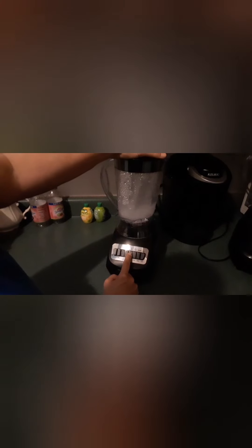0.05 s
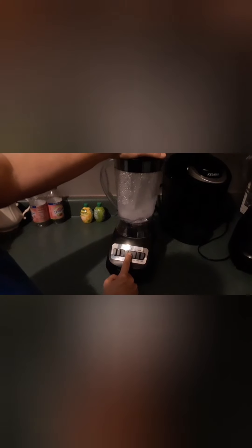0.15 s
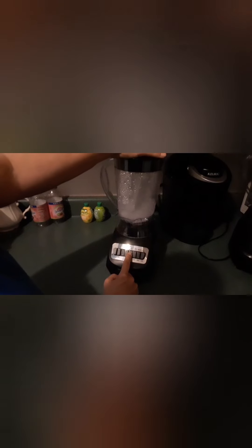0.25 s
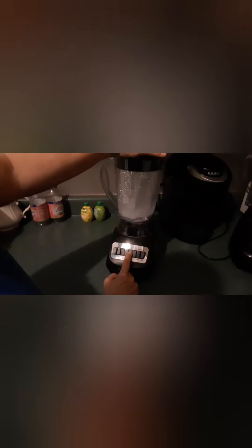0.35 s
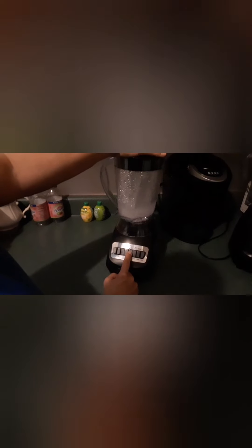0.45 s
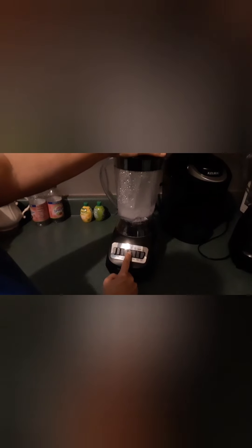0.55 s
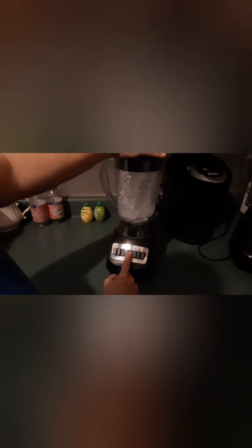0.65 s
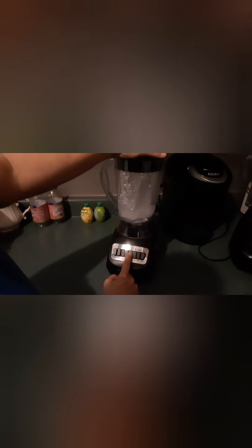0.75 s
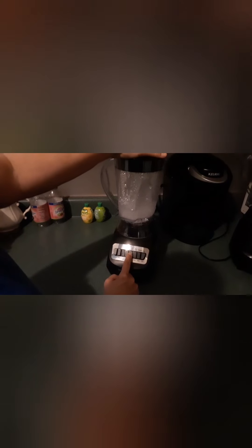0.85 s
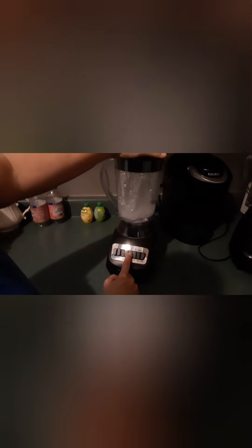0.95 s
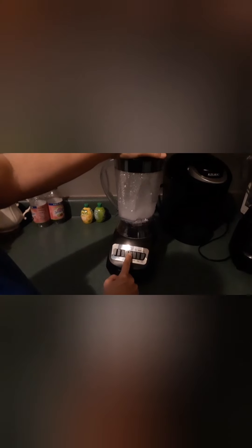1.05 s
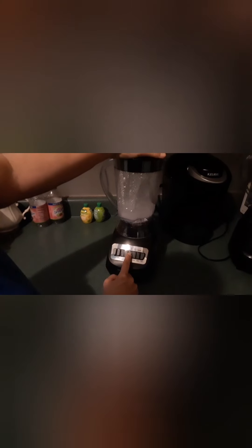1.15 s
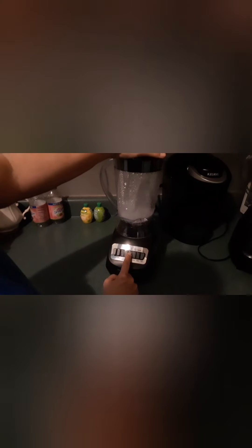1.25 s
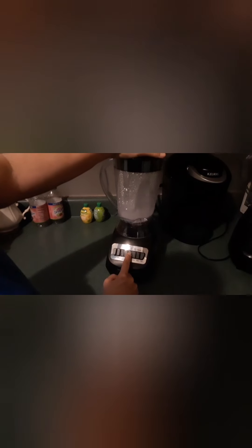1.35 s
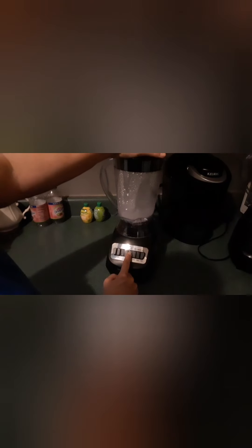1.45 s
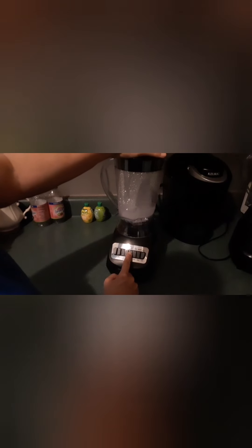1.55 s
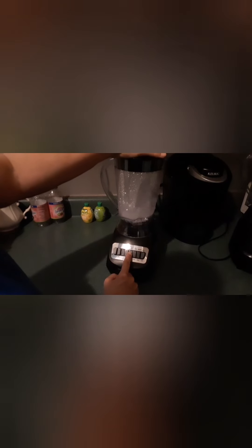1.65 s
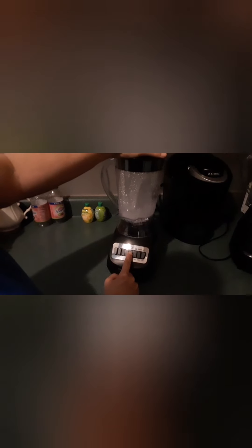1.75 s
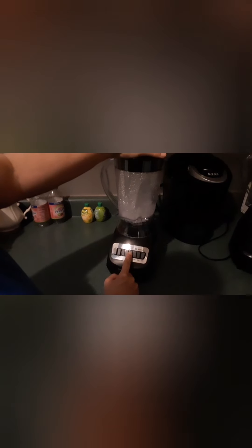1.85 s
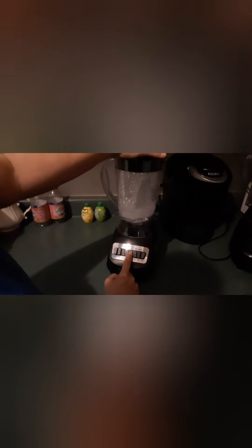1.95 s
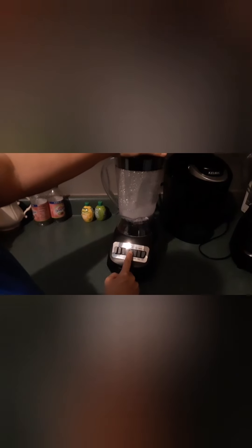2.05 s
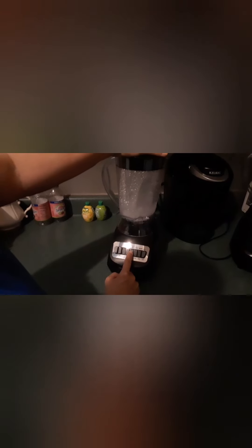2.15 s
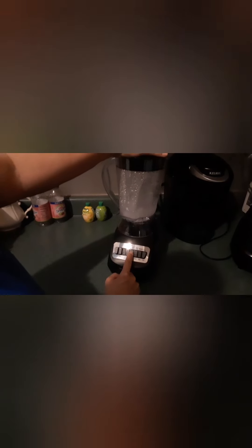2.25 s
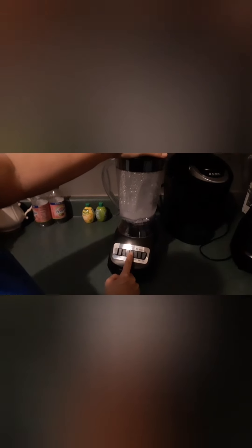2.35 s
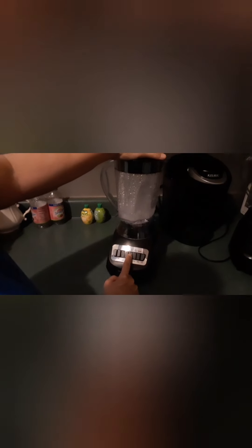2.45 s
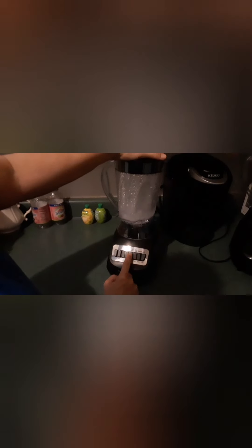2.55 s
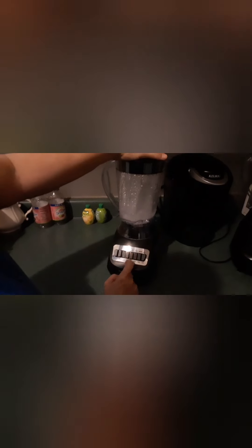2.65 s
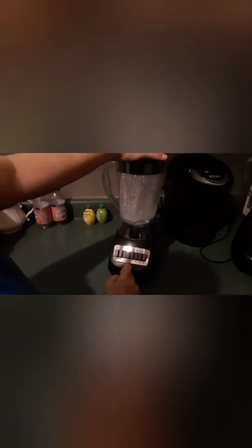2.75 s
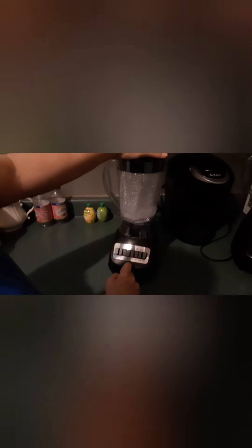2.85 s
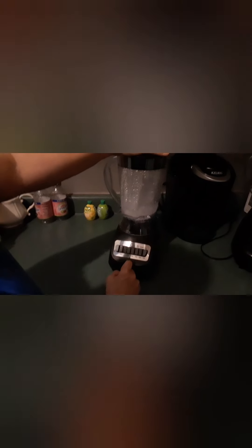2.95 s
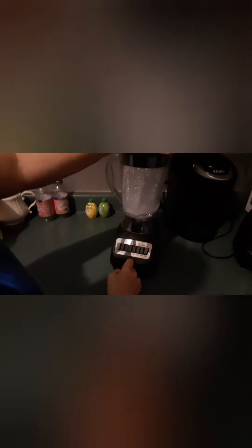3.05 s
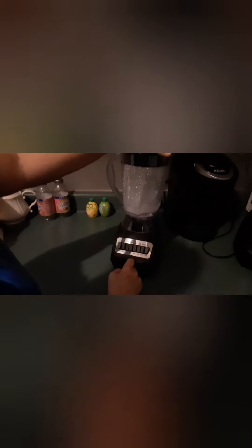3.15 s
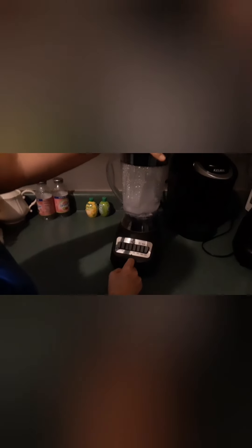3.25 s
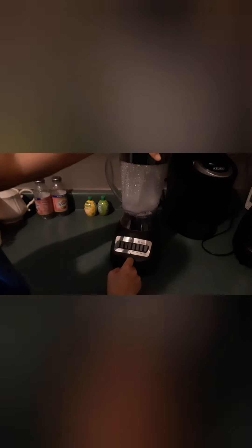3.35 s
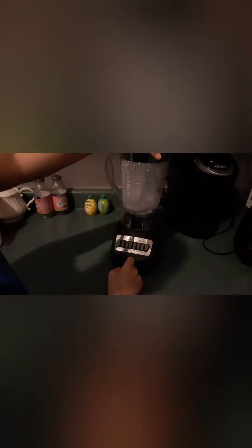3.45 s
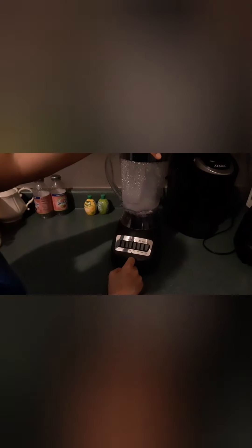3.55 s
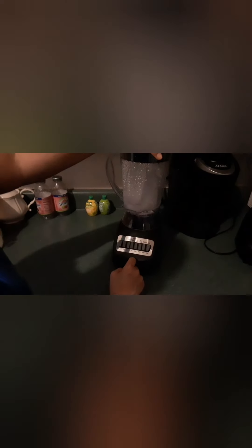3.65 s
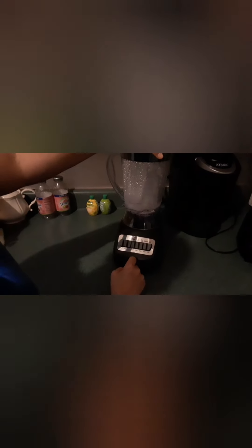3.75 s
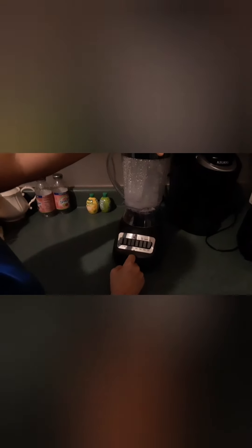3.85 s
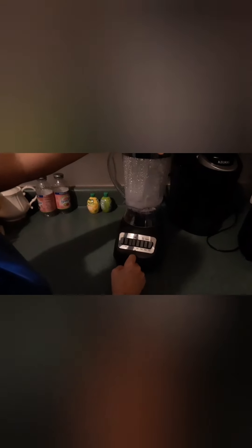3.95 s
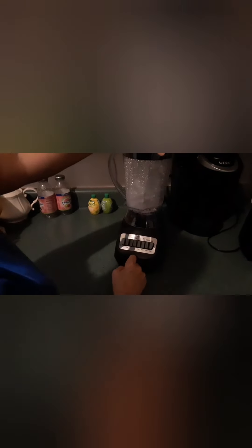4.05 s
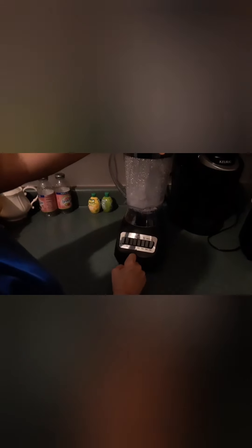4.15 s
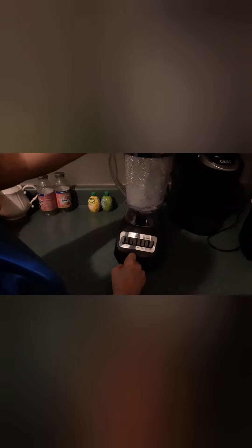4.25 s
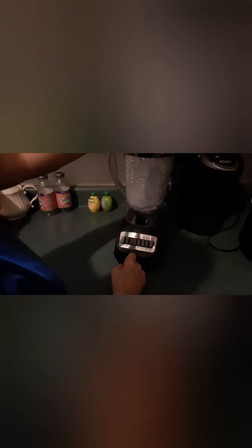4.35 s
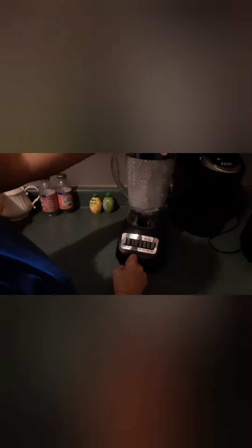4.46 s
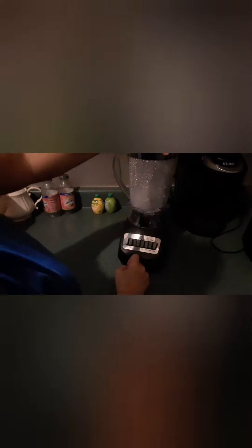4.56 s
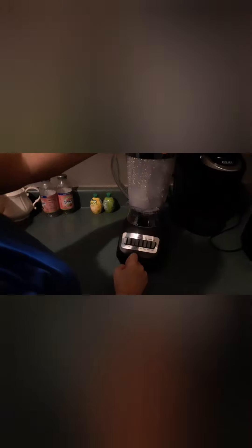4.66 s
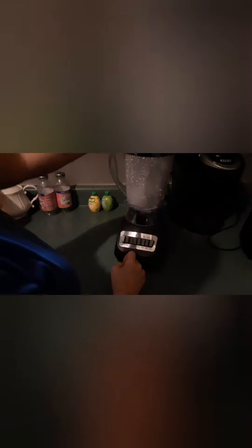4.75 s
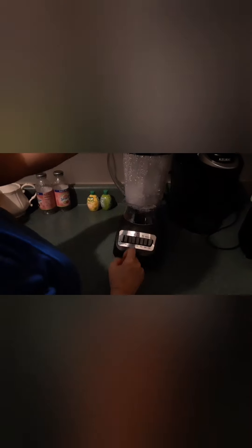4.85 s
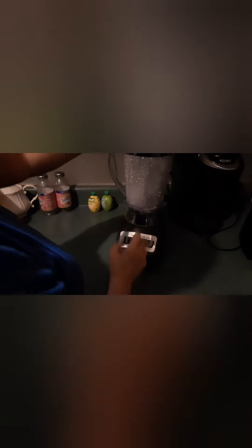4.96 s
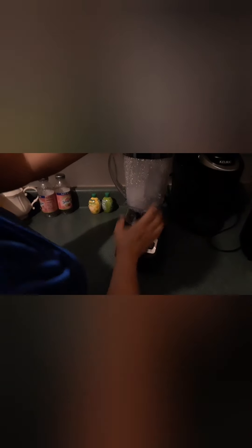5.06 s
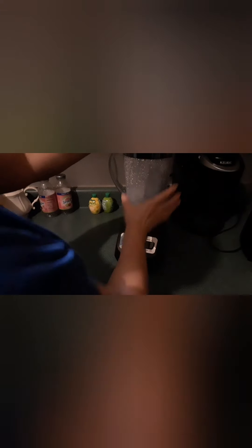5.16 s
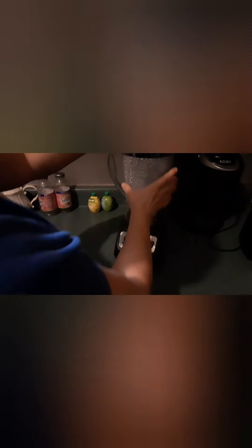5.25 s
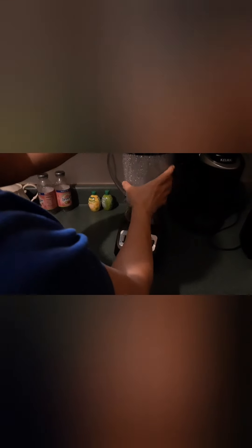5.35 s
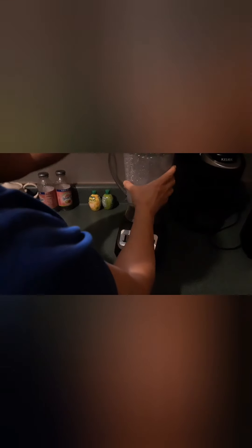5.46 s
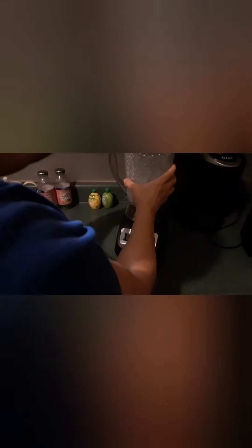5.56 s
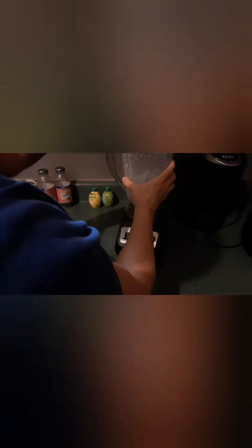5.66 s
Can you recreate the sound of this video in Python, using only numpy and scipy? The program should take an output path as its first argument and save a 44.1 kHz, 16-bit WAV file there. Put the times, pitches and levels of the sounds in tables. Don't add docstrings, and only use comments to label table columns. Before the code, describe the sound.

Loud steady blender churning icy slush, then a gliding wind-down, rattling ice knocks, a faint chatter to rest and soft handling in a quiet kitchen.

```python
import sys
import numpy as np
from scipy import signal
from scipy.fft import rfft, irfft, next_fast_len
from scipy.io import wavfile

SR = 44100
rng = np.random.default_rng(int(sys.argv[2]) if len(sys.argv) > 2 else 0)


def to_wav(s):
    ch = np.atleast_2d(s).T
    pcm = np.round(np.clip(ch, -1, 1) * 32767)
    wavfile.write(sys.argv[1], SR, pcm.astype(np.int16))


def rack_gain(trim_db):
    fader = np.asarray(trim_db, float)
    return 10 ** (fader / 20)


N = 251370
T = np.arange(N) / SR

FULL_HZ, SWITCH_OFF_S = 317.6, 2.07

# frequency in Hz, shared part of the power (0 to 1).
LIKENESS = [(40, .85), (150, 0.98), (300, 1), (650, 0.91), (1200, 0.72), (3000, 0.32), (12000, 0.11)]
# frequency in Hz, left over right in dB.
LEFT_OVER_RIGHT = [(60, -0.5), (150, 2), (380, 2), (950, 2.5), (2380, -5.5), (5980, -1.5), (15000, -7)]


def rms_one(x):
    return x / np.sqrt(np.mean(x ** 2) + 1e-20)


def in_time(rows):
    s, *columns = np.transpose(rows)
    return [np.interp(T, s, c) for c in columns]


def at_hz(points, hz):
    point_hz, value = np.array(points).T
    return np.interp(np.log(hz), np.log(point_hz), value)


def alike_at(hz):
    return np.clip(at_hz(LIKENESS, hz), 0, 1)


def lean_db(hz):
    return at_hz(LEFT_OVER_RIGHT, hz) * np.array([[.5], [-.5]])


def drift(rate):
    r = np.exp(-80 * np.pi * rate / SR)
    slow = signal.lfilter([1], [1, -2 * r, r * r], rng.standard_normal(N // 40 + 2002))[2000:]
    return np.interp(np.arange(N) / 40, np.arange(len(slow)), rms_one(slow - slow.mean()))


def resonance(x, hz, width_hz):
    r = np.exp(-np.pi * width_hz / SR)
    top = np.array([1, 0, -1]) * (1 - r * r) / 2
    return signal.lfilter(top, [1, -2 * r * np.cos(2 * np.pi * hz / SR), r * r], x + 1e-18)


def twice_resonant(x, hz, width_hz):
    return resonance(resonance(x, hz, width_hz), hz, width_hz)


def cut(x, hz, kind, order=2):
    return signal.sosfilt(signal.butter(order, hz, kind, fs=SR, output="sos"), x)


def bands(spectrum, patchy_db, count):
    size = next_fast_len(N)
    hz = np.maximum(np.arange(size // 2 + 1) * SR / size, 1)
    shared, *own = rfft(rng.standard_normal((3, size)))
    alike = alike_at(hz)
    turn = 1.75 * np.sin(2 * np.pi * hz / 1700) * (hz > 900)
    lag = np.exp(1j * turn * np.array([[1], [0]]))
    ears = np.sqrt(alike) * shared * lag + np.sqrt(1 - alike) * np.array(own)
    ears = ears * rack_gain(at_hz(spectrum, hz) + lean_db(hz))
    place = np.clip(np.log(hz / 60) / np.log(260) * (count - 1), 0, count - 1)
    together = drift(4.0)
    for k in range(count):
        share = np.clip(1 - abs(place - k), 0, 1)
        flicker = rack_gain(patchy_db * (.2 * together + drift(14)))
        centre_hz = 60 * 260 ** (k / (count - 1))
        yield centre_hz, flicker * irfft(ears * share, size)[:, :N]


def shaft_hz():
    drag_per_s, friction_hz = .56, 95
    coast_s = np.maximum(T - SWITCH_OFF_S, 0)
    return np.maximum((FULL_HZ + friction_hz) * np.exp(-drag_per_s * coast_s) - friction_hz, .01)


def shaft_turns():
    return np.cumsum(shaft_hz()) / SR


def speed_db():
    return 20 * np.log10(shaft_hz() / FULL_HZ)


def swell_db(hz, db, width):
    return db - 6 * (np.log(shaft_hz() / hz) / width) ** 2


def motor_tones(turns):
    # multiple of the shaft speed, level in dB.
    order_levels = [(2, -3), (3, -10), (4, -6), (5, 1), (6, 2), (8, -1), (10, 2)]
    # shaft speed in Hz, level in dB, width as a log ratio.
    order_swells = [(264, -30.5, .18), (143, -45, .04)]
    # frequency in Hz, level in dB.
    housing = [(400, -6), (800, -3), (1000, -8), (1180, 1), (1350, -7), (1500, 2), (1900, 1), (2020, -5),
               (2220, 6), (2400, -3), (2600, 3), (3000, 3), (3200, -4)]
    powered = np.clip((SWITCH_OFF_S + .06 - T) / .06, 0, 1)
    unbalance_db = swell_db(275, -34, .2) - 6 * powered
    unbalance = rack_gain(unbalance_db + 3 + 2.5 * drift(10)) * np.sin(2 * np.pi * turns + .5 * drift(10))
    orders_db = np.maximum(*[swell_db(*row) for row in order_swells])
    orders, speed_hz = np.zeros((2, N)), np.gradient(turns) * SR
    for multiple, db in order_levels:
        waver_db = 3.5 * drift(10)
        ear_turns = rng.uniform(-.12, .12, (2, 1))
        phase = 2 * np.pi * (multiple * turns + ear_turns) + .7 * drift(10)
        level_db = orders_db + db + at_hz(housing, multiple * speed_hz) + waver_db
        orders += rack_gain(level_db + [[-2], [1]]) * np.sin(phase)
    return unbalance, orders


def roar(turns):
    # time in seconds, level in dB.
    churn = [(0, -12.5), (.5, -13), (1.3, -13), (1.6, -12.5), (2.09, -13), (2.25, -15), (2.41, -19.5),
             (2.6, -21), (2.72, -22.5), (2.97, -27), (3.25, -33), (3.4, -41.5), (3.6, -67)]
    # level in dB at full churn, share of the churn's swing.
    churn_layers = [(-29.5, 0.76), (-13, 1.052), (-15, 1.7)]
    # level in dB at full speed, dB per dB of speed.
    air_layers = [(-41, 1), (-31, .8), (-26, 0.95)]
    # frequency in Hz, noise density in dB per Hz.
    colour = [(30, -56), (110, -15), (190, -12), (270, -12), (420, -7.5), (1050, -7), (1330, -9),
              (1450, -5.5), (3100, 3), (3300, -3), (4750, -4), (5000, -6), (12300, -9.5), (13000, -16)]
    # frequency in Hz, width in Hz, level in dB.
    jar_peaks = [(342, 13, -1.5), (782, 39, -1), (1236, 55, -4), (1789, 18, 4), (1914, 5, 11.0),
                 (2470, 180, -6.5), (3636, 120, -5.0), (4634, 100, -6), (6550, 60, -13), (7770, 27, -19.0),
                 (8930, 350, -12), (11200, 520, -14.0), (196.0, 17, -14.5), (1433, 72, -1.5),
                 (1630, 16, -1.5), (2220, 62, -15.5), (2795, 67, -10.5), (3800, 30, -3.5)]
    swing_db = in_time(churn)[0] + 13
    parts = np.zeros((3, 2, N))
    for hz, band in bands(colour, patchy_db=.8, count=14):
        parts[np.searchsorted([900, 4500], hz)] += band
    noise = np.zeros((2, N))
    for part, (db, share), (air_db, follows) in zip(parts, churn_layers, air_layers):
        slush = rack_gain(db + share * swing_db)
        air = rack_gain(air_db + follows * speed_db())
        noise += np.hypot(slush, air) * rms_one(part)
    noise *= 1 + 0.029 * np.sin(2 * np.pi * turns)
    out = 0.55 * noise
    for hz, width, db in jar_peaks:
        out += rack_gain(db - at_hz(colour, hz) - 5) * resonance(noise, hz, width)
    return out


def brushes(turns):
    # frequency in Hz, width in Hz, level in dB.
    holders = [(5500, 900, -1), (6680, 700, 1), (8250, 500, -3), (9450, 400, 3)]
    # frequency in Hz, width in Hz, level in dB.
    bearing = [(799, 73, -15.5), (1170, 420, -4), (1726, 37, 1), (2070, 90, 1), (2180, 90, -3.5),
               (9350, 69, -6)]
    bars = 12
    tick_db = -23.5 + 2.1 * speed_db() - 36 * np.maximum(3.42 - T, 0)
    half_phase = np.pi * bars * turns + 1e-4
    harmonics = np.minimum(np.floor(.26 / (np.gradient(turns) * bars)), 60)
    ticks = np.sin((2 * harmonics + 1) * half_phase) / (2 * np.sin(half_phase))
    ticks = ticks * rack_gain(tick_db + 3.5 * drift(14))
    whine = sum(rack_gain(db) * twice_resonant(ticks, hz, width) for hz, width, db in holders)
    scrape_db = np.minimum(-30.5 + 1.18 * speed_db(), -36)
    scrape = rack_gain(scrape_db + 19 + 3.3 * drift(50)) * rng.standard_normal((2, N))
    whirr = sum(rack_gain(db) * resonance(scrape, hz, width) for hz, width, db in bearing)
    return (whine + whirr) * rack_gain([[-2], [2]])


def blows(rows, rattle_s):
    s, db, bright_db, thump_db = np.transpose(rows)[:, :, None]
    late, chance = np.moveaxis(rng.exponential(1, (len(s), 14, 2)), -1, 0)
    late = np.minimum(late, 3)
    weaker_db = 9 + 3 * chance + 2.5 * late
    late[:, 0], weaker_db[:, 0] = 0, 0
    return s + late * rattle_s, db - weaker_db, bright_db, thump_db


def slides(rows):
    s, length, db, bright_db, thump_db = np.transpose(rows)[:, :, None]
    draws = rng.random((len(s), 2, 70))
    part = (np.arange(70) + draws[:, 0]) / 70
    arch_db = 20 * np.log10(np.sin(np.pi * part ** .8) + .05)
    return s + part * length, db + arch_db + 1.8 * np.log(draws[:, 1]), bright_db, thump_db


def knocks(contacts, ring_hz, gain_db, snap_db, longest_s):
    # frequency in Hz, level in dB, 60 dB decay time in seconds.
    jar_modes = [(341.5, -8, 0.72), (385, -4, 0.21), (557, -9.5, 0.031), (632, -1.5, 0.077),
                 (807, 6.5, 0.032), (1025, -3, 0.018), (1190, -5, 0.015), (1470, -1.5, 0.025),
                 (1680, 3, 0.022), (1900, -7.5, 0.029), (2088, -6, .06), (2330, -5, 0.24),
                 (2500, -4.5, 0.031), (2700, -7.5, .06), (2960, -14, 0.015), (3330, -6, 0.062),
                 (3683, -6, 0.062), (4320, -8, 0.043), (4830, -5.5, 0.042), (5260, -12.5, 0.032),
                 (5900, -21.5, 0.027), (6700, -29.5, .03), (7450, -32.5, .03), (9300, -21, .04),
                 (12400, -7.5, .012), (13100, -9.5, .012)]
    columns = []
    for k in range(4):
        columns.append(np.concatenate([np.broadcast_to(c[k], c[0].shape).ravel() for c in contacts]))
    s, db, bright_db, thump_db = columns
    size, at = rack_gain(db + gain_db), np.minimum((s * SR).astype(int), N - 1)
    ringing = np.zeros((2, N))
    for hz, mode_db, t60 in jar_modes:
        colour_db = bright_db + 18 if hz > 5500 else thump_db + 12 if hz < 900 else 0 * db
        colour_db = colour_db + 7 * np.exp(-(np.log(hz / ring_hz) / .25) ** 2)
        clicks, alike = np.zeros((2, N)), alike_at(hz)
        both, *own = rng.normal(0, 1, (3, len(s)))
        for ear in (0, 1):
            chance = np.sqrt(alike) * both + np.sqrt(1 - alike) * own[ear]
            np.add.at(clicks[ear], at, size * rack_gain(mode_db + colour_db) * chance)
        r = rack_gain(-60 / (min(t60, 150 / hz, longest_s) * SR))
        w = 2 * np.pi * hz / SR
        mode = signal.lfilter([0, np.sin(w)], [1, -2 * r * np.cos(w), r * r], clicks + 1e-18)
        ringing += rack_gain(lean_db(hz)) * mode
    gate = np.zeros((2, N))
    np.add.at(gate[0], at, size * rack_gain(8.5))
    np.add.at(gate[1], at, size * rack_gain(bright_db + 19.0))
    burst = signal.lfilter([1], [1, -rack_gain(-60 / (0.007 * SR))], gate + 1e-18)
    crack = burst * rng.standard_normal((2, 2, N))
    crack = cut(crack[:, 0], [700, 4500], "band") + cut(crack[:, 1], 4500, "high")
    snap = rack_gain(snap_db) * cut(gate[0], [1200, 7000], "band")
    return cut(ringing, 200, "high") + (snap + crack) * rack_gain([[-2], [2]])


def crumb():
    return [(4.166 + .041 * k, -29.5 - k, -20, -15) for k in range(11)]


def ice_on_blades():
    # time in seconds, peak in dB, brightness in dB, low thump in dB.
    lumps = [(3.168, -13.5, -18, -27), (3.235, -16, -23.5, -35), (3.259, -7.5, -17.5, -44),
             (3.325, -11, -28.5, -15), (3.33, -8, -25, -21.5), (3.339, -5.5, -24.5, -20.5),
             (3.405, -14, -20.5, -30), (3.55, -15, -17, -27), (3.563, -9.5, -30.5, -23),
             (3.568, -9.5, -26, -28), (3.579, -10, -17.5, -25), (3.599, -17, -8.5, -21),
             (3.633, -11, -12.5, -38), (3.75, -9.5, -22.5, -19.5), (3.755, -9.5, -13, -36),
             (3.945, -30.5, -18.5, -23), (3.967, -13.5, -34, -28), (3.975, -22.5, -26, -16),
             (3.986, -7.5, -11, -18.5), (4.0, -17, -29.5, -36), (4.049, -27, -12.5, -35),
             (4.1, -32, -14, -30)]
    # start in seconds, length in seconds, level in dB, brightness in dB, low thump in dB.
    tumbles = [
        (3.19, 0.18, -17, -16, -22),
        (3.325, .04, -11, -17.5, -15.5),
        (3.34, 0.072, -18, -11.5, -26),
        (3.55, .11, -28.5, -7.5, -26),
        (3.98, 0.077, -32.5, -21, -40),
    ]
    contacts = [blows(list(lumps) + crumb(), rattle_s=.0045), slides(tumbles)]
    return knocks(contacts, ring_hz=2080, gain_db=-17.0, snap_db=6.0, longest_s=.06)


def bearing_squeak():
    # ring in Hz, width in Hz, shaft speed in Hz, level in dB, width as a log ratio of speed.
    rings = [(2110, 170, 26, -47, .42), (1770, 150, 10, -57, .6)]
    rub = rack_gain(5.5 * drift(45)) * rng.standard_normal((2, N))
    return sum(rack_gain(swell_db(*swell)) * rms_one(twice_resonant(rub, hz, width)) for hz, width, *swell in rings)


def hand_on_jar():
    # time in seconds, peak in dB, brightness in dB, low thump in dB.
    taps = [
        (5.267, -38, -15, -7),
        (5.286, -43, -20, 2),
        (5.392, -38, -13.5, -5),
        (5.491, -36, -13, -13.5),
        (5.517, -23, -20, -19),
        (5.66, -30.5, -27.5, -15.5),
    ]
    # start in seconds, length in seconds, level, brightness and low thump in dB.
    scuffs = [
        (5.266, .035, -45.5, -19.5, -16),
        (5.37, 0.13, -46, -4.5, -13.5),
        (5.485, .075, -40, -13, -10),
    ]
    contacts = [blows(taps, rattle_s=.009), slides(scuffs)]
    return knocks(contacts, ring_hz=1340, gain_db=-16, snap_db=-8.0, longest_s=.024)


def kitchen(x):
    t60_s, level_db = .33, -9
    t = np.arange(int(.6 * SR)) / SR
    noise = rng.standard_normal((2, len(t)))
    tail = cut(noise, 2100, "low") * rack_gain(-60 * t / t60_s)
    tail += cut(noise, 4000, "high") * rack_gain(-60 * t / (0.43 * t60_s))
    tail *= t > .006
    tail /= np.sqrt((tail ** 2).sum(1, keepdims=True))
    return rack_gain(level_db) * signal.fftconvolve(x, tail, axes=1)[:, :N]


def room_tone():
    # time in seconds, room tone in dB.
    level = [
        (0, -50),
        (2.5, -77),
        (2.8, -45),
        (3.4, -45.5),
        (3.98, -45.5),
        (4.3, -48.5),
        (4.71, -54.5),
        (5.05, -50),
        (5.7, -47),
    ]
    # frequency in Hz, air noise density in dB per Hz.
    air_colour = [(20, -26), (49, -12), (86, -10), (119, 0.5), (193, -3), (297, -2.5), (433, -9),
                  (631, -13), (1200, -14), (2500, -23.5), (6500, -32), (7500, -43.5), (11000, -36),
                  (12000, -35)]
    # frequency in Hz, width in Hz, level in dB.
    hum_modes = [(122, 15, -20.5), (163.8, 13, -9), (301.3, 14, -7), (470, 7.4, -14)]
    air = rms_one(sum(band for hz, band in bands(air_colour, patchy_db=-1.0, count=8)))
    white = rng.standard_normal(N)
    masked_db = 8 * np.clip(4.1 - T, 0, .2) / 0.15
    rumble = rack_gain(-58.5 + 1.3 * drift(2.5) - masked_db) * rms_one(twice_resonant(white, 56, 14))
    hum = sum(rack_gain(db) * rms_one(twice_resonant(white, hz, width)) for hz, width, db in hum_modes)
    return rack_gain(in_time(level)[0]) * cut(air + hum, 80, "high") + rumble


def scene():
    turns = shaft_turns()
    unbalance, orders = motor_tones(turns)
    struck = brushes(turns) + ice_on_blades() + bearing_squeak() + hand_on_jar()
    reflected = kitchen(struck + rack_gain(-3) * orders)
    return unbalance + orders + roar(turns) + struck + reflected + room_tone()


def roll_off(x):
    return signal.sosfilt(signal.butter(12, 15680, fs=SR, output="sos"), x)


def record(dry):
    since = T - 3.34
    duck_db = 6 * np.clip(since / 0.086, 0, 1) * np.exp(-np.maximum(since, 0) / 0.19)
    rounded = 1.433 * np.tanh(rack_gain(-duck_db) * cut(dry, 40.6, "high") / 1.183)
    top = signal.ellip(12, .3, 60, 15700, fs=SR, output="sos")
    mix = signal.sosfilt(top, rounded)
    return roll_off(mix)


dry = scene()
out = record(dry)
to_wav(out)
```